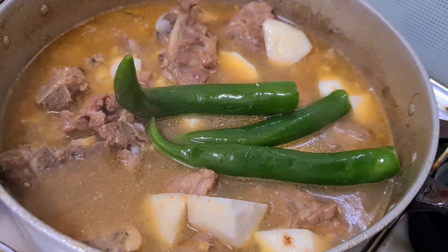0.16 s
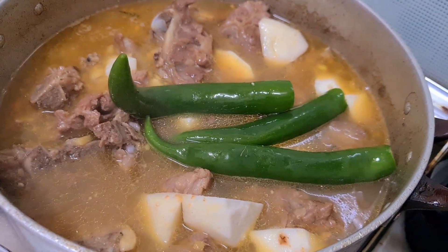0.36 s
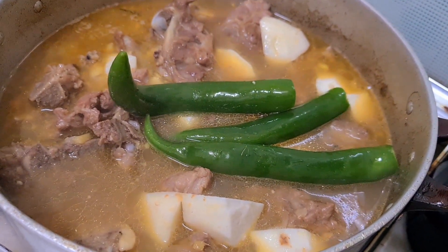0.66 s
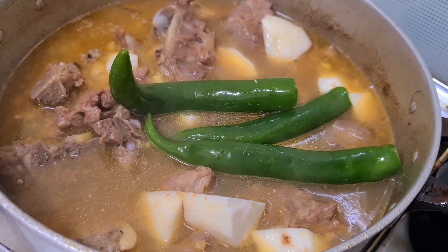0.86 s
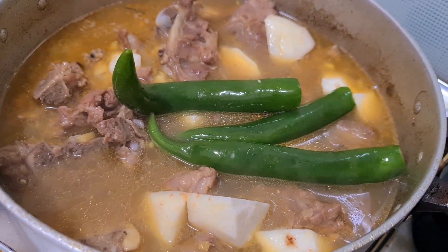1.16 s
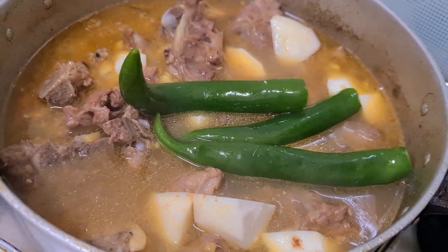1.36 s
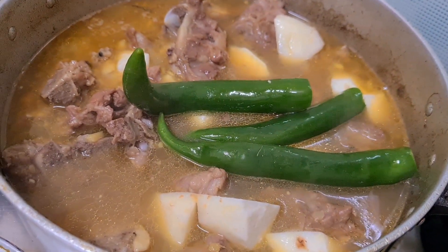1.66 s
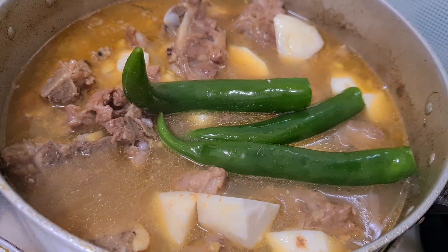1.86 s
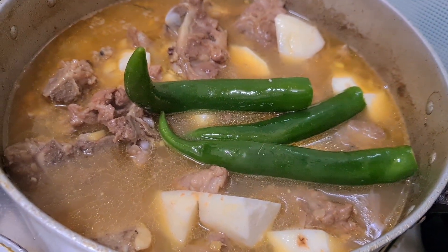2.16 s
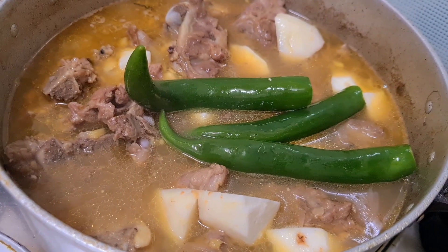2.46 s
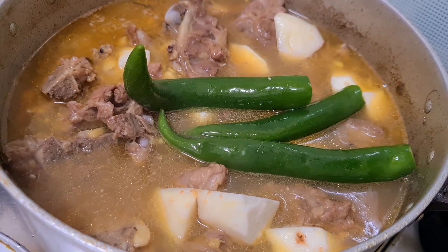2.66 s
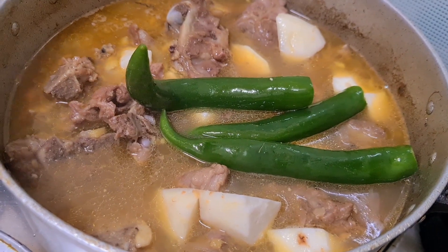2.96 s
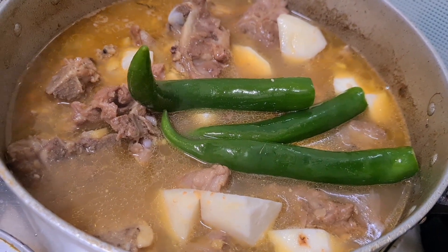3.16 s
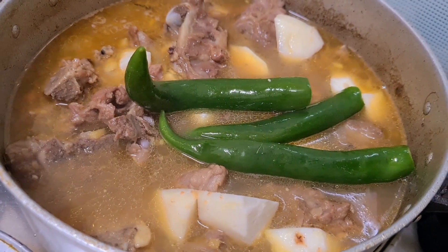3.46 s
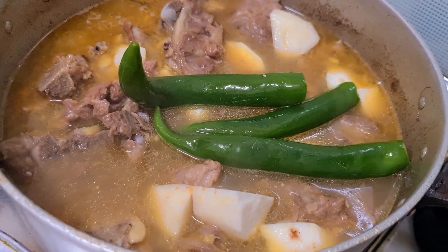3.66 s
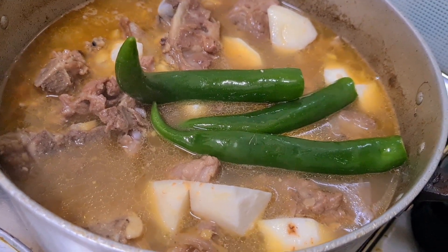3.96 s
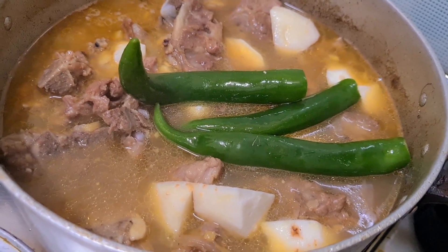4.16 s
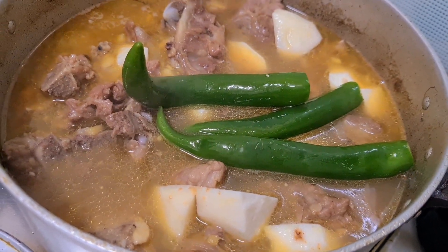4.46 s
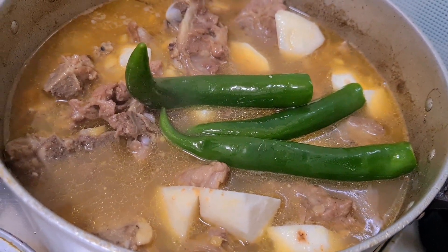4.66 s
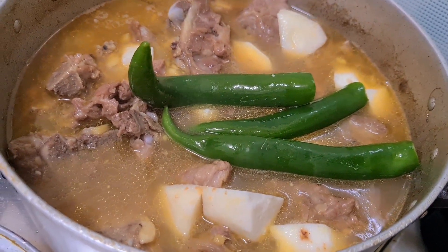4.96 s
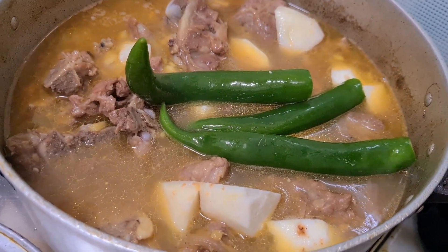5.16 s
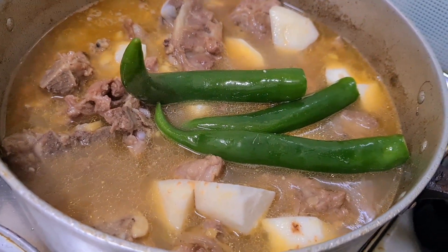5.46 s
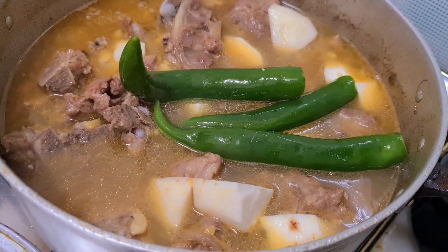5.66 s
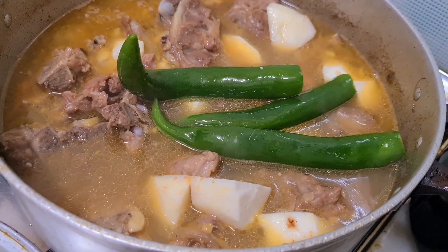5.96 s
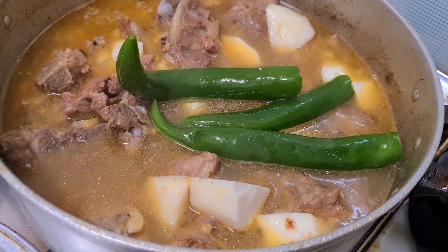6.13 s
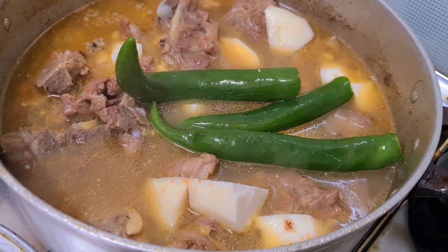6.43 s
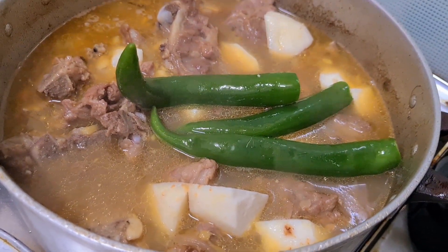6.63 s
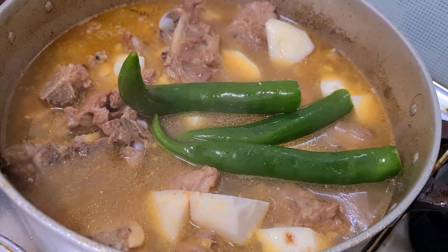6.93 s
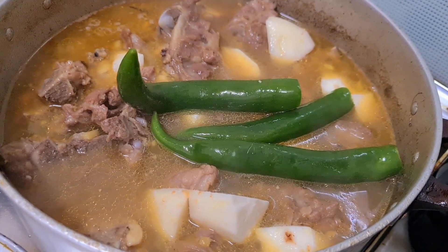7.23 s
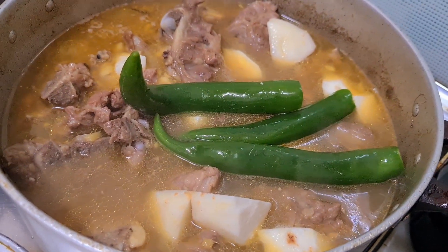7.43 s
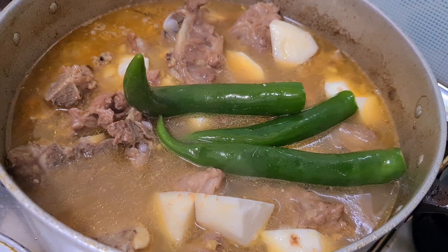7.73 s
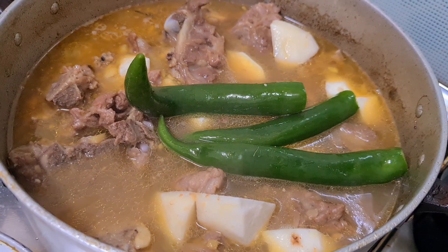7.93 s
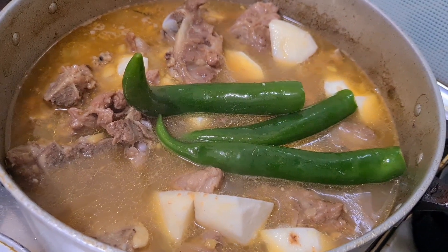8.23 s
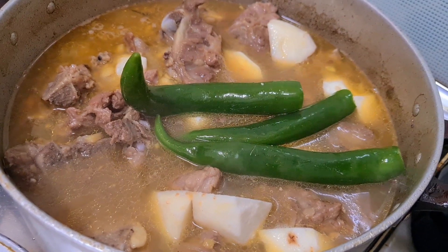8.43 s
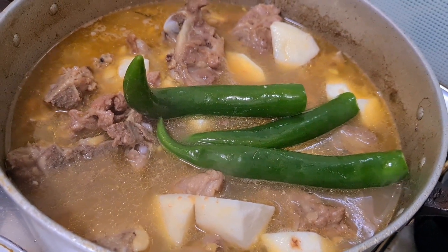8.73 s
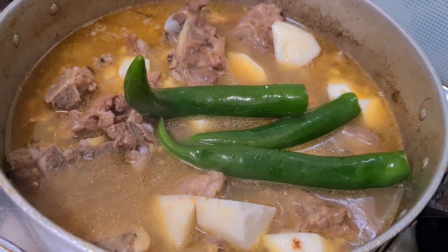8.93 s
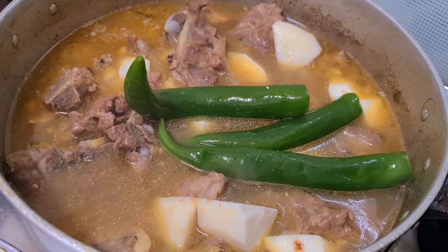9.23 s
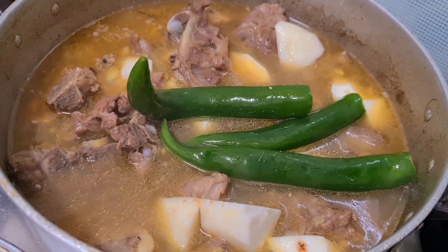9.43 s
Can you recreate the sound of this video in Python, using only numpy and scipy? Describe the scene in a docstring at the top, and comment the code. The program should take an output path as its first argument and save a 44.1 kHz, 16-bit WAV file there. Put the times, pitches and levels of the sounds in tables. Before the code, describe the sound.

A fine, steady hiss and sizzle rises from broth simmering in a big metal pot, dotted with bright little pops and sharp droplet ticks. At first the pot throbs with a low rumble, which mostly dies away before the middle. Brief frothy gurgles and hollow plops come at irregular moments, with one stronger pop a little past halfway. The microphones sit close above the rim, in a kitchen, with a faint stove hum beneath.

```python
"""A kitchen stove, a stereo pair of microphones just above the rim of a large metal pot of simmering broth.
Up close, tiny bubbles fizz and crackle as they burst, larger ones plip and plop, and droplets spit.
Now and then steam lifts the broth in a gurgling surge; the air in the pot rings along.
Steam collapsing on the bottom rumbles, mostly in the first seconds, over the stove's soft rush and hum."""
import sys
import numpy as np
from scipy import signal
from scipy.fft import rfft, irfft, next_fast_len
from scipy.io import wavfile
from scipy.ndimage import uniform_filter1d, map_coordinates

SR = 44100
rng = np.random.default_rng(int(sys.argv[2]) if len(sys.argv) > 2 else 0)


def unload_audio(sound):
    """Save the sound as a 16-bit wav file, at the path given as the first command line argument."""
    columns = np.transpose(np.atleast_2d(sound))
    # keep every value between -1 and 1, then stretch to whole-number steps
    steps = np.round(np.clip(columns, -1, 1) * 32767)
    wavfile.write(sys.argv[1], SR, steps.astype(np.int16))


N = 422919


# strength of the simmer and of the foam's sizzle, before each layer's offset: (time [s], level [dB])
SIMMER_LEVEL = [(0.0, -41), (0.53, -41.5), (0.82, -39.5), (2.35, -41.5), (2.8, -41), (5.29, -42),
                (8.36, -41), (8.92, -39.5), (9.21, -42), (9.59, -40)]
FOAM_LEVEL = [(0.0, -37), (0.45, -40.5), (0.93, -39), (1.55, -42.5), (1.89, -39), (2.54, -40), (2.7, -39),
              (3.04, -40), (3.9, -40.5), (4.09, -42), (4.86, -37), (5.1, -39), (5.55, -37.5), (5.77, -39),
              (7.64, -37.5), (8.04, -52), (8.57, -42.5), (8.73, -38), (9.11, -40), (9.24, -39.5),
              (9.59, -38)]
# colours of the hiss and the sizzle: (frequency [Hz], gain [dB])
HISS_COLOUR = [(400, -16), (1100, -14), (1900, -6), (3200, -1), (5400, -1.5), (7200, -3), (8600, -2),
               (11000, -5.5), (13500, -10), (15500, -15.5)]
SIZZLE_COLOUR = [(1000, -29), (1550, -7.5), (1950, 0.5), (2400, 3), (3300, 2), (4500, 1), (5400, 8),
                 (6500, -12), (10000, -9.5)]
def fizz():
    """Countless pinhead bubbles burst below the microphones: a fine hiss and a lower, grainy sizzle."""
    hiss = patchy(rng.standard_normal((2, N)) + amp(-.5) * crackle(count=9000, spread_db=1))
    sizzle = patchy(rng.standard_normal((2, N)) / 3 + crackle(count=3200, spread_db=3.5))
    # each layer flickers on its own
    hiss_db = curve(SIMMER_LEVEL) + 2.5 + 1.7 * wobble(rate_hz=22)
    sizzle_db = curve(FOAM_LEVEL) - 4.5 + 2 * wobble(rate_hz=22)
    return (amp(hiss_db) * stereo_bed(hiss, HISS_COLOUR, lag_s=.00055)
            + amp(sizzle_db) * stereo_bed(sizzle, SIZZLE_COLOUR, lag_s=.00056))


def prickle():
    """Small bubbles tinkle and tick all over the surface; the smallest ring for only a few cycles."""
    tinkle = swarm(count=1400, low_hz=2607, high_hz=6250, offset_db=7.5, spread_db=8.5)
    small = swarm(count=800, low_hz=2900, high_hz=6300, offset_db=12, spread_db=12)
    tiny = swarm(count=1100, low_hz=5200, high_hz=12500, offset_db=18.5, spread_db=15)
    spots = bubbles(tinkle, cycles=11, glide=.02, spots=6)
    spots += bubbles(small, cycles=5.5, glide=.12, spots=6)
    spots += bubbles(tiny, cycles=4.5, glide=.05, spots=6)
    return at_microphones(spots, wall_db=-11, room_db=-5, pan_db=3)


# larger bubbles opening at the surface: (time [s], level [dB], pitch [Hz], decay time [s],
# delay to the right microphone [s], level of each neighbour relative to the bubble [dB])
PLIP_BUBBLES = [(0.1064, -20.5, 3280, 0.0021, 0.00079, -10.5), (0.1952, -26, 4900, 0.0022, 0.00057, -10),
                (0.439, -26, 3200, 0.0019, 0.0005, -10), (0.4622, -32, 2130, 0.0019, 0.00048, -15),
                (0.563, -30, 4500, 0.0019, 0.00077, -2), (0.8707, -26.5, 3620, 0.0025, 0.00054, -12),
                (0.9309, -30, 2300, 0.0013, 0.00045, -14), (1.206, -33, 3220, 0.0011, 0.00052, -25),
                (1.2673, -26, 3630, 0.0013, 0.00054, -7), (1.4048, -21.0, 5250, 0.0009, 0.00057, -17),
                (1.5676, -25.0, 4950, 0.0017, 0.00077, -16), (1.6632, -23.5, 2870, 0.0018, 0.00043, -14),
                (1.707, -26, 3230, 0.0017, 0.0005, -10), (1.9403, -23, 3350, 0.00086, 0.00054, -10.5),
                (2.154, -26, 3140, 0.0032, 0.00054, -16), (2.2459, -29.0, 2830, 0.0018, 0.00048, -24),
                (2.2711, -23, 4100, 0.0011, 0.00054, -19), (2.3008, -27.5, 2460, 0.003, 0.00045, -13),
                (2.3548, -25.5, 2160, 0.0015, 0.00048, -14), (2.46, -15.5, 4900, 0.0011, 0.00034, -13),
                (2.5291, -23.5, 5010, 0.0012, 0.00057, -24), (2.6273, -27, 5000, 0.0014, 0.00057, -25),
                (2.668, -18.5, 3550, 0.0019, 0.00079, -11.5), (2.757, -23, 4220, 0.00078, 0.00054, -18),
                (2.8544, -20, 3430, 0.0026, 0.00079, -14), (2.9933, -20, 3500, 0.0021, 0.00079, -12),
                (3.085, -27.5, 2630, 0.0013, 0.00051, -12), (3.1619, -22, 4770, 0.001, 0.00054, -8),
                (3.302, -24.0, 5410, 0.0015, 0.00057, -24), (3.353, -23, 3730, 0.0011, 0.00027, -6),
                (3.573, -21.5, 3900, 0.0024, 0.00045, -11), (3.7424, -14.5, 3330, 0.003, 0.00079, -24),
                (3.765, -29, 3320, 0.0026, 0.00079, -9), (4.0533, -20.5, 2970, 0.0014, 0.00048, -13),
                (4.2656, -24.5, 4780, 0.0017, 0.00077, -2), (4.476, -25.5, 3320, 0.0026, 0.00079, -14),
                (4.6838, -25, 5580, 0.0013, 0.00057, -6), (4.7193, -22, 2970, 0.002, 0.00045, -11),
                (4.7885, -24.5, 2250, 0.0026, 0.0005, -19), (4.8315, -26, 3400, 0.002, 0.00079, -11),
                (4.8635, -33, 2120, 0.0013, 0.00048, -11), (4.8896, -22.5, 2900, 0.0029, 0.00043, -20),
                (4.9092, -31, 2980, 0.002, 0.00075, -14), (5.0348, -26, 6200, 0.0012, 0.00057, -7),
                (5.3634, -22.5, 3750, 0.0014, 0.00052, -10), (5.44, -24.5, 3630, 0.0022, 0.00054, -14),
                (5.462, -24, 4490, 0.0015, 0.00054, -8), (5.5922, -26.5, 3180, 0.0022, 0.0005, -9),
                (5.6137, -23.5, 3800, 0.0019, 0.00054, -7.5), (5.681, -30, 4070, 0.0018, 0.00079, -24),
                (5.8324, -27, 5420, 0.0014, 0.00054, -24), (5.853, -26, 3300, 0.0024, 0.00052, -24),
                (5.9643, -22, 3770, 0.002, 0.00045, -7), (5.9878, -31, 2300, 0.0023, 0.00073, -8),
                (6.0816, -14.5, 4540, 0.001, 0.00054, -20), (6.2556, -28.0, 3570, 0.0015, 0.00054, -24),
                (6.2913, -22.5, 3800, 0.002, 0.00052, -9), (6.3226, -19, 3920, 0.0021, 0.00052, -8),
                (6.4408, -23, 3850, 0.0015, 0.00045, -7), (6.4587, -22.5, 3560, 0.0013, 0.00052, -6.5),
                (6.475, -22, 5600, 0.0011, 0.00055, -14), (6.4978, -26.0, 5580, 0.0022, 0.00075, -12),
                (6.584, -22.5, 2860, 0.0018, 0.00043, -20), (6.604, -31, 2850, 0.0025, 0.00057, -8),
                (6.7224, -24, 3480, 0.0012, 0.00079, -8), (6.746, -25, 4900, 0.0012, 0.00036, -24),
                (6.882, -26, 5950, 0.0015, 0.00055, -16), (6.912, -22, 2570, 0.00085, 0.00048, -14.5),
                (7.1098, -18.5, 2410, 0.0019, 0.0005, -16), (7.1308, -31, 2750, 0.0024, 0.00027, -10),
                (7.2037, -16.5, 5140, 0.00051, 0.00057, -26), (7.2533, -21.5, 5050, 0.0013, 0.00054, -10),
                (7.313, -26, 4260, 0.0013, 0.00057, -24), (7.4286, -21, 3320, 0.0018, 0.00079, -14),
                (7.4934, -26.5, 3350, 0.0018, 0.00079, -14), (7.656, -25, 4910, 0.0013, 0.00054, -23),
                (7.747, -22, 3400, 0.0032, 0.00079, -15), (7.877, -27, 4930, 0.0012, 0.00054, -5),
                (8.0023, -24, 3260, 0.0022, 0.00052, -26), (8.3156, -19.5, 3340, 0.00064, 0.00079, -22),
                (8.354, -20.5, 4700, 0.001, 0.00054, -11), (8.5537, -24.5, 3320, 0.0019, 0.0005, -24),
                (8.6107, -24.5, 5440, 0.0014, 0.00036, -17), (8.6899, -21, 5460, 0.00069, 0.00054, -12),
                (8.8246, -17.5, 3780, 0.0015, 0.0005, -18), (8.8929, -26, 6140, 0.00062, 0.00057, -24),
                (8.9921, -23.5, 5300, 0.0012, 0.00057, -14), (9.053, -20, 2170, 0.0021, 0.0005, -24),
                (9.0822, -23.5, 4870, 0.0011, 0.00057, -24), (9.1626, -24.5, 4250, 0.0014, 0.00054, -24),
                (9.208, -19, 3230, 0.0015, 0.00079, -16)]
# colour of the tearing film: (frequency [Hz], gain [dB])
SPLASH_COLOUR = [(500, -17), (1300, -8), (2000, 2), (3500, 3), (5500, 2), (7000, -7), (14000, -18)]
def plips():
    """Bubbles chirp as they open, large ones over a wider glide; the film splashes and the pot rings."""
    time, db, hz, life, lag, neighbour_db = np.transpose(PLIP_BUBBLES)
    glide = .31 * (2100 / hz) ** 2

    def ring(when, spots):
        return bubbles(np.column_stack([when, db, hz]), life * hz, glide, spots)

    direct = np.vstack([ring(time, spots=1), ring(time + lag, spots=1)])
    echoes = at_microphones(ring(time, spots=8), wall_db=-14, room_db=-6, pan_db=1, direct=False)
    splashes = bursts(np.column_stack([time, db - 17]), life_s=.0045, spots=8)
    splashes = coloured(splashes, SPLASH_COLOUR)
    cluster = bubbles(neighbours(time, db + neighbour_db, hz), cycles=5.5, glide=.04, spots=8)
    spray = at_microphones(splashes + cluster, wall_db=-13, room_db=-4.5, pan_db=1)
    return filtered(direct + echoes + spray, pot_resonance)


def neighbours(time, db, hz, count=12, scatter_s=.013, scatter_pitch=.14):
    """Around each plip a cluster of similar bubbles gives way: rows of (time, level, pitch)."""
    delay, detune = rng.standard_normal((len(time), 2, count)).transpose(1, 0, 2)
    when = np.abs(time[:, None] + scatter_s * (delay + .5))
    pitch = hz[:, None] * np.exp(scatter_pitch * detune)
    return np.column_stack([when.ravel(), np.repeat(db, count), pitch.ravel()])


# big bubbles from the bottom of the pot: (time [s], level [dB], pitch [Hz])
PLOP_BUBBLES = [(.24, -36, 168), (.468, -44, 172), (.531, -39.5, 226), (.575, -36, 185), (.797, -43, 285),
                (.838, -41, 265), (.885, -43, 260), (1.181, -47, 188), (1.675, -51, 160), (2.141, -39, 171),
                (2.255, -35.5, 233), (2.285, -34, 240), (2.372, -34, 375), (3.015, -38.5, 157),
                (3.04, -40.5, 231), (3.316, -47, 180), (3.35, -41, 258), (4.685, -39.5, 520),
                (4.893, -27, 474), (4.8955, -22, 760), (4.897, -35, 145), (5.285, -42, 149),
                (5.288, -39, 462), (6.011, -32.5, 332), (6.014, -25, 1060), (6.022, -19, 2120),
                (6.032, -29.5, 394), (6.045, -33, 366), (6.039, -30.5, 816), (6.042, -27, 1110),
                (7.812, -37.5, 254), (7.815, -41, 460)]
def plops():
    """Big bubbles give a short hollow note that rings in the pot."""
    notes = bubbles(PLOP_BUBBLES, cycles=2.6, glide=.06, spots=4)
    pair = at_microphones(notes, wall_db=-17, room_db=-4, pan_db=1, lag_s=.0002)
    return filtered(pair, pot_resonance)


# droplets spitting close to the microphones: (time [s], level [dB])
DROPLETS = [(.5616, -27), (.8111, -23), (.8644, -26), (1.4356, -24), (2.0502, -22), (2.4285, -19),
            (2.8429, -22), (2.8615, -12.5), (2.8665, -16), (2.873, -16), (3.0818, -24), (3.3262, -21),
            (3.4248, -16), (3.8498, -21), (4.2028, -26), (4.8917, -21), (5.1432, -21), (6.0048, -23),
            (6.0752, -24), (7.9413, -19), (8.8922, -23.5), (9.1985, -23.5), (9.3816, -26)]
def spits():
    """Droplets snap with a bright crack about a millisecond long; fainter ones tick at random."""
    crack_colour = [(300, -12), (1500, -1.5), (5000, 3), (10000, 5.5), (15000, -7.5)]
    faint = rng.uniform([0, -39], [N / SR, -31], size=(60, 2))  # (time [s], level [dB])
    snaps = bursts(DROPLETS, life_s=.0006, spots=4) + bursts(faint, life_s=.0004, spots=4)
    return coloured(at_microphones(snaps, wall_db=-15, room_db=-3, pan_db=2), crack_colour)


# the broth wells up: (crest time [s], rise [s], fall [s], gurgle [dB], froth [dB], hollow note [dB])
UPWELLINGS = [(.58, 0.055, 0.061, -52, -67, -57), (.86, 0.052, 0.091, -50, -48, -46.5),
              (2.29, 0.053, 0.041, -45.5, -38.5, -62), (2.4, 0.029, 0.085, -41, -40, -53),
              (2.87, .007, 0.02, -59, -51, -41.5), (3.36, 0.04, 0.031, -48.5, -49, -65),
              (4.056, 0.0084, .018, -59, -35.5, -68), (4.73, 0.092, 0.1, -59, -41, -68),
              (4.905, 0.017, 0.028, -44, -39, -65), (5.66, 0.028, 0.029, -72, -37.5, -49),
              (5.976, 0.016, 0.046, -52, -32.5, -65), (6.03, 0.038, 0.042, -45.5, -37, -50),
              (8.19, 0.12, 0.14, -60, -46, -48.5)]
# colours of a surge's three voices: (frequency [Hz], gain [dB])
GURGLE_COLOUR = [(60, -6), (130, 7), (250, 6.5), (400, -4), (620, -1), (820, -10), (1200, -0.5),
                 (2500, -32)]
FROTH_COLOUR = [(350, -51), (800, 3), (1300, 4.5), (2100, 1.5), (3600, 2.5), (6000, -2), (12000, -23)]
HOLLOW_COLOUR = [(250, -24), (295, 20), (315, -29), (370, -7.5)]
def surges():
    """A rush of steam lifts the broth: a low gurgle, a wet froth above, and a hollow note of the pot."""
    t = np.arange(N) / SR
    gurgle_gain, froth_gain, hollow_gain = np.zeros((3, N))
    for crest, rise, fall, gurgle_db, froth_db, hollow_db in UPWELLINGS:
        swell = np.exp(-.5 * ((t - crest) / np.where(t < crest, rise, fall)) ** 2)
        gurgle_gain += amp(gurgle_db) * swell
        froth_gain += amp(froth_db) * swell
        hollow_gain += amp(hollow_db) * swell
    gurgle = stereo_bed(crackle(count=4000, spread_db=0), GURGLE_COLOUR, lag_s=.0002)
    froth = stereo_bed(crackle(count=9000, spread_db=-4), FROTH_COLOUR, lag_s=.0005)
    hollow = stereo_bed(rng.standard_normal((2, N)), HOLLOW_COLOUR, lag_s=.0002)
    return gurgle_gain * gurgle + froth_gain * froth + hollow_gain * hollow


def glugs(count, low_hz, high_hz, offset_db):
    """Each surge throws up count bubbles around its crest: rows of (time, level, pitch)."""
    crest, rise, fall, gurgle_db = np.transpose(UPWELLINGS)[:4, :, None]
    delay, strength = rng.standard_normal((len(UPWELLINGS), 2, count)).transpose(1, 0, 2)
    when = crest + delay * np.where(delay < 0, rise, fall)
    hz = low_hz * (high_hz / low_hz) ** rng.random(when.shape)
    return np.stack([when, gurgle_db + offset_db + 2 * strength, hz], axis=-1).reshape(-1, 3)


def burble():
    """Middle-sized bubbles blip faintly at random and crowd together in the surges."""
    strays = swarm(count=150, low_hz=700, high_hz=2000, offset_db=2, spread_db=13)
    crowd = glugs(count=14, low_hz=380, high_hz=1500, offset_db=2.5)
    blips = bubbles(np.vstack([strays, crowd]), cycles=2.4, glide=.3, spots=2)
    pair = at_microphones(blips, wall_db=-11, room_db=-3, pan_db=2, lag_s=.0003)
    return filtered(pair, pot_resonance)


# boiling on the bottom, only fitful from the fourth second on: (time [s], level [dB])
RUMBLE_LEVEL = [(0.0, -41.5), (0.08, -41), (0.1, -46.5), (0.74, -41.5), (0.77, -50), (1.01, -50),
                (1.12, -39.5), (1.28, -49), (1.33, -41), (1.36, -50), (1.57, -54), (1.68, -40), (1.89, -51),
                (1.92, -39.5), (2.14, -49), (2.32, -34.5), (2.37, -41), (2.4, -30), (2.46, -38.5),
                (2.51, -37), (2.54, -45.5), (2.88, -43), (2.91, -54), (2.96, -44.5), (3.18, -45),
                (3.23, -53), (3.28, -38.5), (3.82, -55), (4.75, -63), (4.94, -46), (5.02, -64), (5.05, -53),
                (5.39, -67), (5.72, -61), (5.77, -70), (6.01, -61), (6.2, -64), (6.22, -55), (6.3, -64.5),
                (8.09, -60), (8.17, -44.5), (8.41, -69), (8.86, -54), (9.16, -68), (9.32, -51), (9.59, -63)]
# colour of the shaking pot: (frequency [Hz], gain [dB])
RUMBLE_COLOUR = [(50, -50), (70, -10), (82, 0.5), (98, 0), (118, -15.5), (160, -14.5), (200, -22),
                 (400, -37.5)]
def rumble():
    """Steam collapsing on the bottom shakes the pot in a narrow low band, in uneven throbs."""
    shake = stereo_bed(rng.standard_normal((2, N)), RUMBLE_COLOUR, lag_s=.00011)
    running_rms = np.sqrt(np.abs(uniform_filter1d(np.mean(shake ** 2, axis=0), size=2600)))
    throb_db = 1.5 * wobble(rate_hz=14)
    return amp(curve(RUMBLE_LEVEL) + throb_db) * shake / running_rms


# colour of the stove's rush, from under the pot: (frequency [Hz], gain [dB])
STOVE_COLOUR = [(15, -4), (28, 5.5), (40, -7), (62, -5.5), (100, -0.5), (170, -17.5), (240, -10.5),
                (380, -15.5), (520, -8.5), (800, -14), (1500, -7.5), (3000, -46)]
def stove(hum_hz=48.9, hum_db=-57.3, rush_db=-51):
    """A steady soft rush and a slightly wavering mains hum."""
    phase = 2 * np.pi * hum_hz * np.arange(N) / SR + .19 * wobble(rate_hz=3.4)
    rush = stereo_bed(rng.standard_normal((2, N)), STOVE_COLOUR, lag_s=.00027)
    return amp(hum_db) * np.sqrt(2) * np.sin(phase) + amp(rush_db) * rush


# air modes between broth and rim: (frequency [Hz], width [Hz], strength [dB])
AIR_MODES = [(243.4, 8.7, -4.5), (307.2, 12.6, 6.5), (359, 9.1, -6.5), (423, 13, 1.5), (507.4, 20, 0.5),
             (773, 66, -2.5), (816, 18.6, 7), (964, 6.5, 4.5), (1910, 75, -0.5), (2085, 15, 0),
             (2618, 29, 0.5), (2780, 18, 1.5), (3418, 13, 0.5), (4930, 32, -4.5)]
def pot_resonance(hz):
    """The air in the pot lifts sound at its modes."""
    return 1 + sum(amp(db) * 1j * hz * width / (centre ** 2 - hz ** 2 + 1j * hz * width)
                   for centre, width, db in AIR_MODES)


# reverberation of the kitchen: (frequency [Hz], time to fall 60 dB [s])
KITCHEN_DECAY = [(200, 0.06), (800, 0.29), (3000, 0.17), (12000, 0.079)]
def at_microphones(spots, wall_db, room_db, pan_db, lag_s=.00053, direct=True):
    """Each spot reaches the pair straight (if direct), off the pot wall, and through the kitchen."""
    earliest_s, latest_s = [[.001], [.002], [.003], [.008]], [[.002], [.003], [.008], [.014]]
    out = np.zeros((2, N))
    for spot in spots:
        hz, t, noise = signal.stft(rng.standard_normal((2, SR // 4)), SR, nperseg=256)
        decay = amp(-60 * t / along(KITCHEN_DECAY, hz)[:, None])
        tail = signal.istft(noise * decay, SR, nperseg=256)[1]
        path = amp(room_db) * tail / np.linalg.norm(tail[0])
        arrival = np.array([0, round(abs(lag_s * (1 + rng.normal() / 10)) * SR)])
        path[[0, 1], arrival] += direct * amp(pan_db * rng.normal() * np.array([.5, -.5]))
        wall_delays = (rng.uniform(earliest_s, latest_s, (4, 2)) * SR).astype(int)
        path[[0, 1], arrival + wall_delays] += amp(wall_db)
        out += signal.oaconvolve(spot[None], path, axes=1)[:, :N]
    return out


# likeness of left and right microphone: (frequency [Hz], coherence [0 to 1])
COHERENCE = [(60, 0.98), (130, 0.94), (290, 1), (640, 0.83), (1400, 0.72), (3100, 0.22), (7000, 0.032),
             (15000, 0.033)]
def stereo_bed(pair, colour, lag_s):
    """Two unrelated noises ring in the pot and blend into stereo of rms 1, the right side lag_s later."""
    def response(hz):
        angle = np.arccos(np.clip(along(COHERENCE, hz), -1, 1)) / 2
        return amp(along(colour, hz)) * pot_resonance(hz) * [np.cos(angle), np.sin(angle)]

    mid, side = filtered(pair, response)
    return unit(np.array([mid + side, np.roll(mid - side, round(lag_s * SR))]))


def bubbles(rows, cycles, glide, spots, swell=.13):
    """Opening cavities ring as damped sines (time, level, pitch), dealt out to spots on the surface."""
    time, db, hz, cycles, glide = np.broadcast_arrays(*np.transpose(rows), cycles, glide)
    life = cycles / hz * SR  # decay time in samples
    length = (6 * life).astype(int)
    bubble = np.repeat(np.arange(len(time)), length)
    age = np.arange(len(bubble)) - (np.cumsum(length) - length)[bubble]
    lives = age / life[bubble]
    envelope = np.minimum(lives / swell, np.exp(swell - lives))
    # each note starts flat by the share glide and rises to its pitch
    turns = cycles[bubble] * (lives - glide[bubble] * (1 - np.exp(-2 * lives)) / 2)
    wave = amp(db)[bubble] * envelope * np.sin(2 * np.pi * turns)
    at = (time * SR).astype(int)[bubble] + age
    return np.bincount(bubble % spots * N + at % N, wave * (at < N), spots * N).reshape(spots, N)


def swarm(count, low_hz, high_hz, offset_db, spread_db):
    """Random bubbles, most weak, whose level follows the simmer: rows of (time, level, pitch)."""
    when, strength, pitch = rng.random((count, 3)).T
    hz = low_hz * (high_hz / low_hz) ** pitch
    db = curve(SIMMER_LEVEL)[(when * N).astype(int)] + offset_db + spread_db * (strength ** 4 - 1)
    return np.column_stack([when * N / SR, db, hz])


def bursts(rows, life_s, spots):
    """Dying puffs of noise (time, level), dealt out to spots on the surface."""
    out = np.zeros((spots, N + SR))
    t = np.arange(SR // 12) / SR
    for k, (time, db) in enumerate(rows):
        puff = amp(db) * np.exp(-t / life_s) * rng.standard_normal(len(t))
        out[k % spots, round(time * SR):][:len(t)] += puff
    return out[:, :N]


def crackle(count, spread_db):
    """Two trains of count random impulses; spread_db sets how unequal they are."""
    where = rng.integers(N, size=(2, count))
    sizes = amp(spread_db * np.minimum(rng.exponential(size=(2, count)), 4))
    sizes *= rng.choice([-1, 1], (2, count))
    return unit(np.array([np.bincount(at, size, N) for at, size in zip(where, sizes)]))


def patchy(x, depth_db=1.5):
    """Different pitches swell and ebb on their own as patches of foam come and go."""
    spectrum = signal.stft(x, nperseg=512)[2]
    patches = rng.standard_normal(spectrum.shape[1:])
    for _ in range(2):
        patches = uniform_filter1d(uniform_filter1d(patches, size=12, axis=0), size=11, axis=1)
    return signal.istft(spectrum * amp(depth_db * unit(patches)), nperseg=512)[1][:, :N]


def amp(db):
    """Decibels to gain."""
    return 10 ** (np.asarray(db) / 20)


def unit(x):
    """Scale to rms 1."""
    return x / np.sqrt(np.mean(x ** 2) + 1e-20)


def along(points, hz):
    """Interpolate (frequency, value) points on a log axis."""
    knots, values = np.transpose(points)
    return np.interp(np.log(hz + 1), np.log(knots + 1), values)


def curve(points):
    """Interpolate (time, value) points at every sample."""
    return np.interp(np.arange(N) / SR, *np.transpose(points))


def wobble(rate_hz):
    """A smooth random curve with rate_hz knots a second."""
    knots = rng.standard_normal(int(N * rate_hz / SR) + 4)
    return map_coordinates(knots, [np.arange(N) * rate_hz / SR])


def filtered(x, response):
    """Filter x by a complex response of frequency."""
    size = next_fast_len(N + SR // 2, True)
    return irfft(rfft(x, size) * response(np.fft.rfftfreq(size, 1 / SR)), size)[..., :N]


def coloured(x, colour):
    """Filter x by (frequency, gain) points."""
    return filtered(x, lambda hz: amp(along(colour, hz)))


def scene():
    """Everything in and under the pot, heard from just above the rim."""
    return fizz() + prickle() + plips() + burble() + plops() + spits() + surges() + rumble() + stove()


# mismatch of the microphones: (frequency [Hz], left minus right [dB])
MIC_BALANCE = [(60, -0.5), (110, -1), (200, -1.5), (380, -1.5), (700, 0), (1290, -0.5), (2380, -2.5),
               (4400, -0.5), (8120, -1.5), (15000, 2.5)]
TOP_HZ = 15550
def record(dry):
    """Two slightly unlike microphones and a steep band limit."""
    sides = np.array([[.5], [-.5]])
    return filtered(dry, lambda hz: amp(along(MIC_BALANCE, hz) * sides) * (hz < TOP_HZ))


dry = scene()
out = record(dry)
unload_audio(out)
```